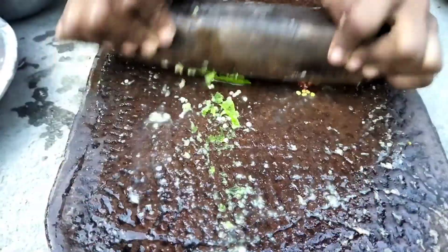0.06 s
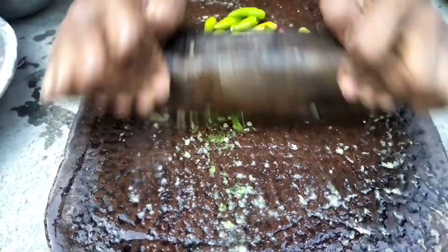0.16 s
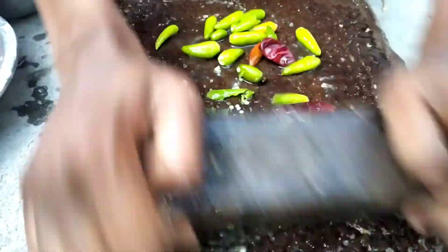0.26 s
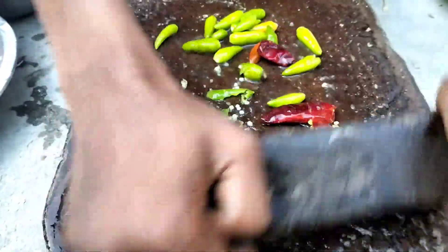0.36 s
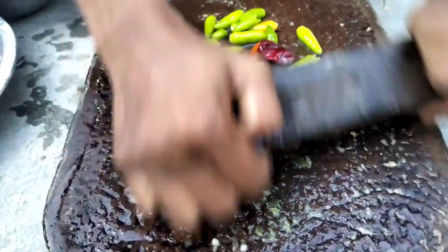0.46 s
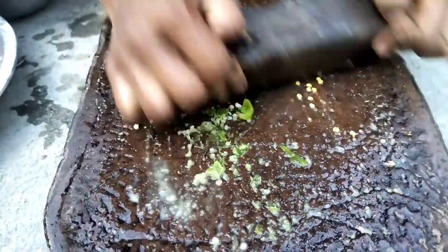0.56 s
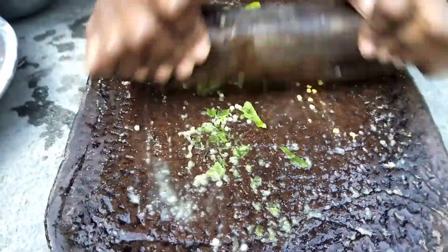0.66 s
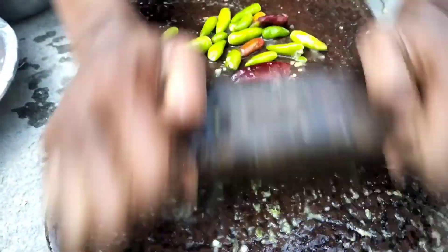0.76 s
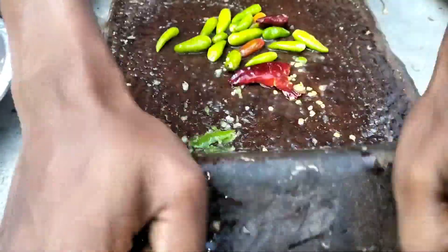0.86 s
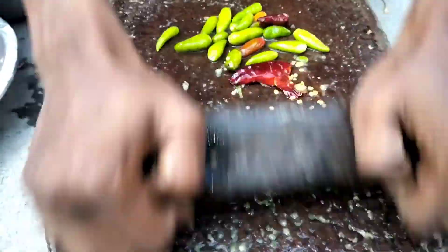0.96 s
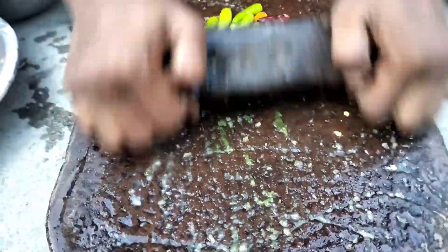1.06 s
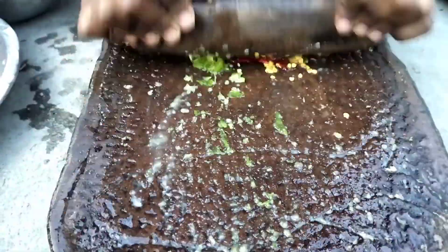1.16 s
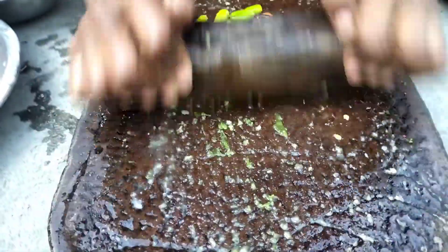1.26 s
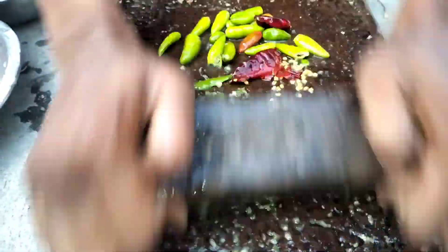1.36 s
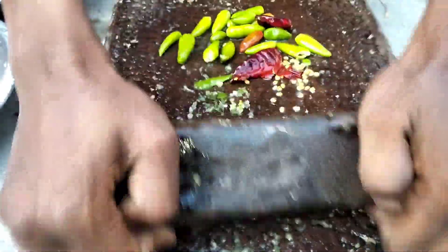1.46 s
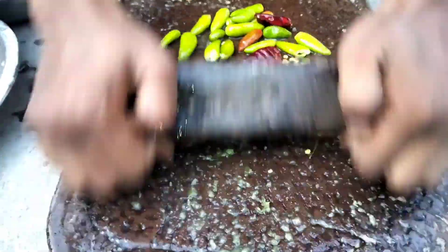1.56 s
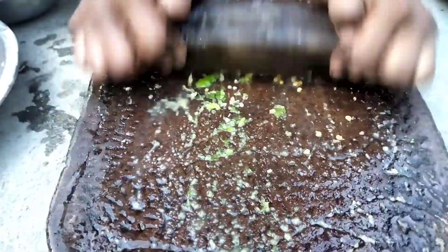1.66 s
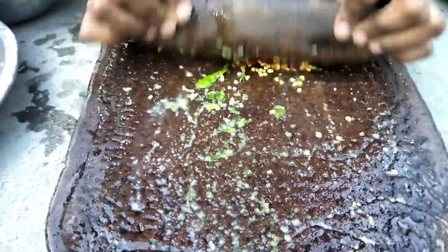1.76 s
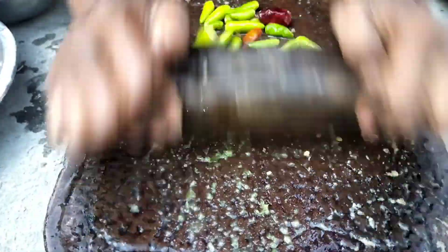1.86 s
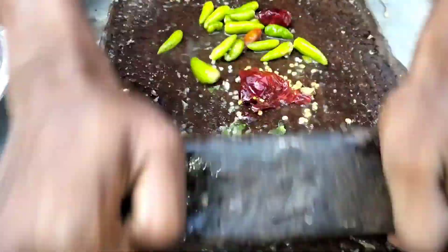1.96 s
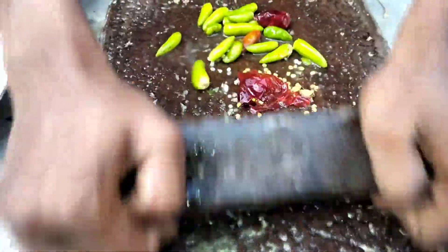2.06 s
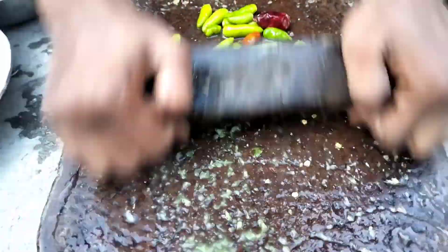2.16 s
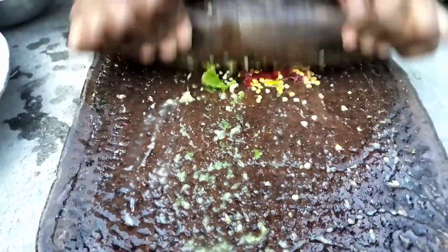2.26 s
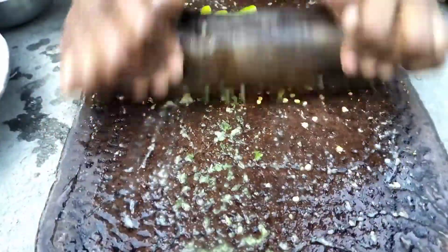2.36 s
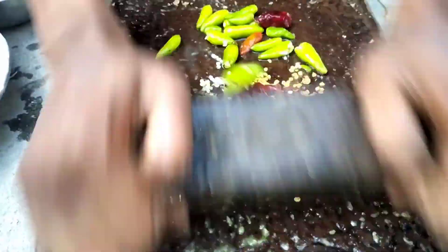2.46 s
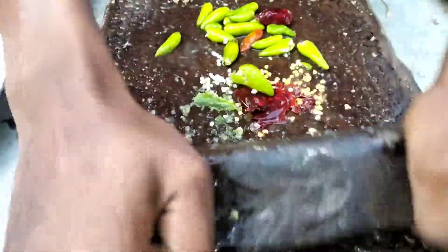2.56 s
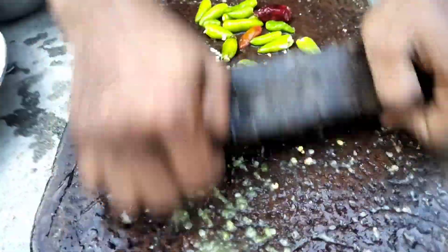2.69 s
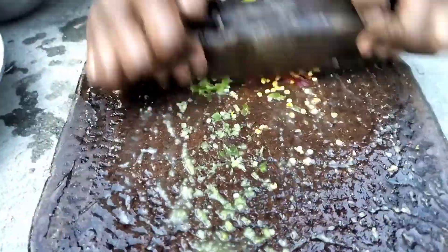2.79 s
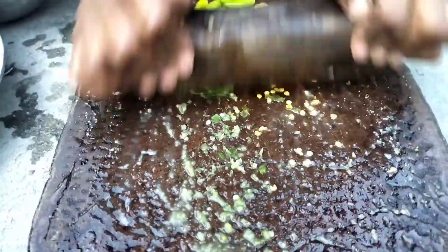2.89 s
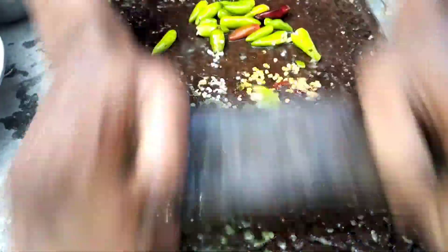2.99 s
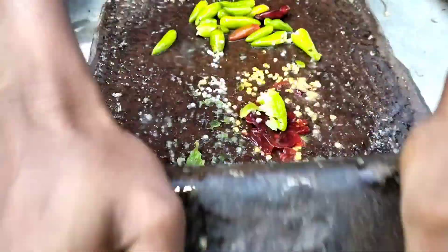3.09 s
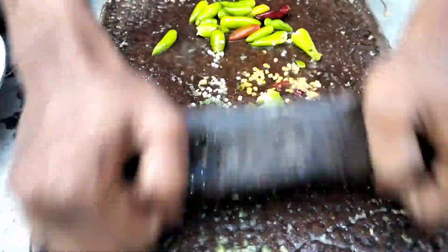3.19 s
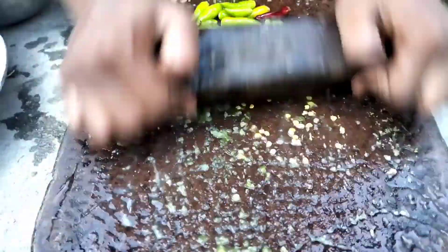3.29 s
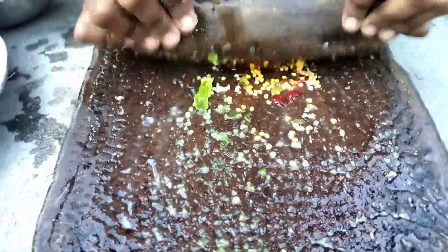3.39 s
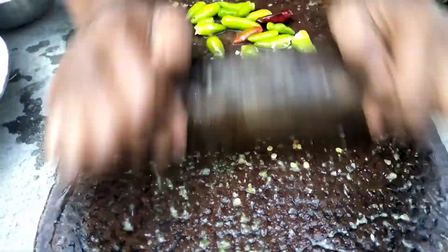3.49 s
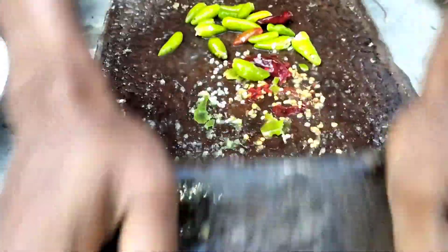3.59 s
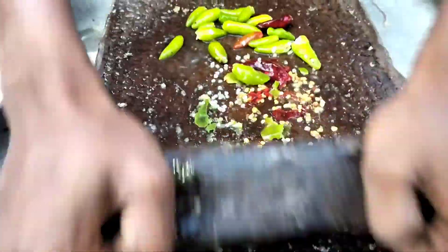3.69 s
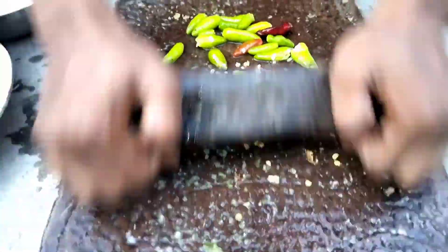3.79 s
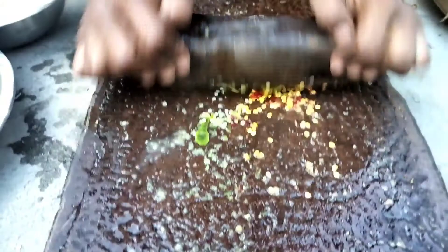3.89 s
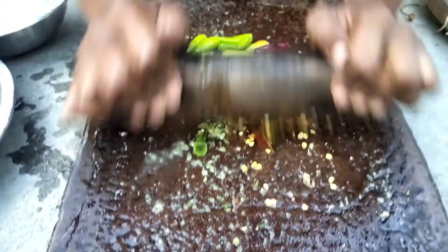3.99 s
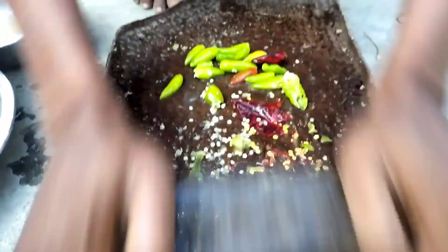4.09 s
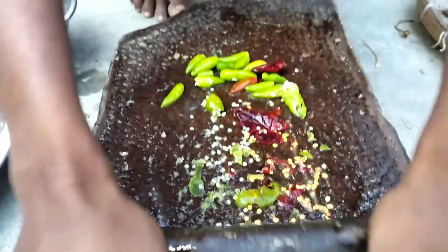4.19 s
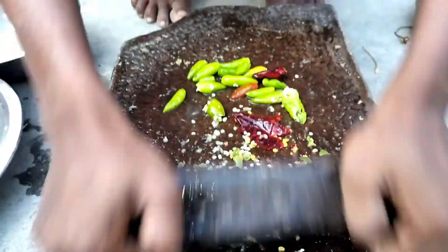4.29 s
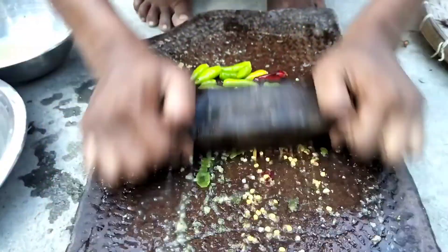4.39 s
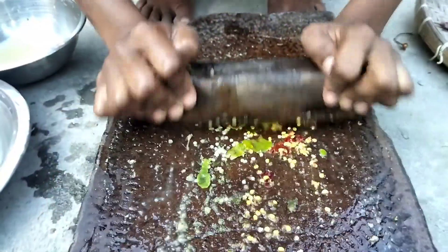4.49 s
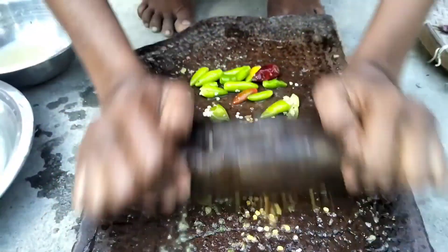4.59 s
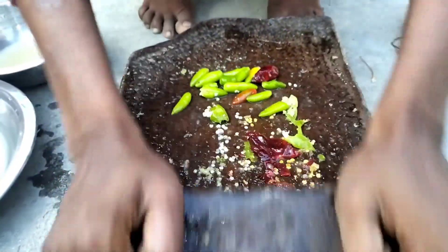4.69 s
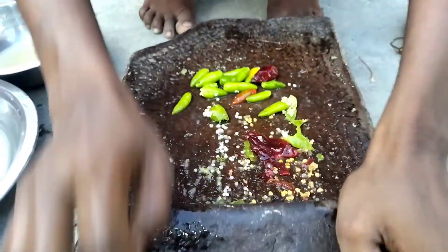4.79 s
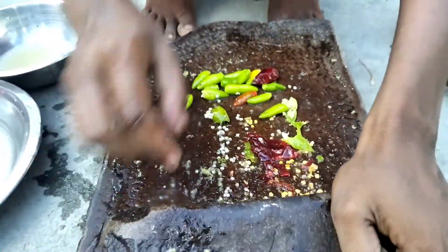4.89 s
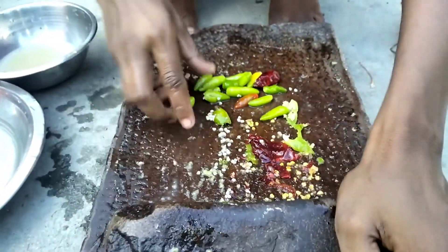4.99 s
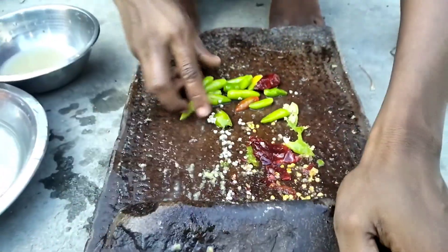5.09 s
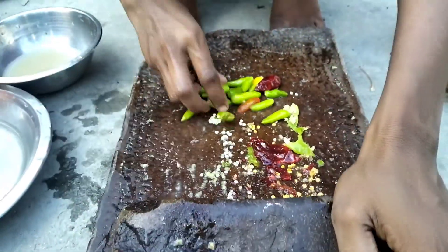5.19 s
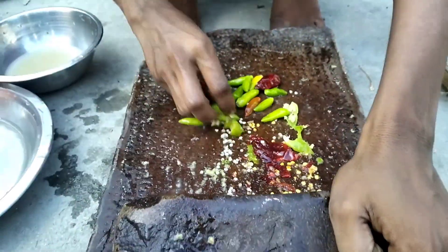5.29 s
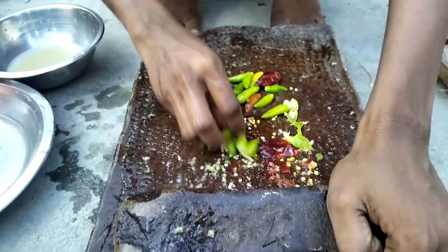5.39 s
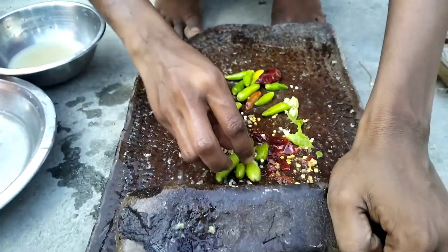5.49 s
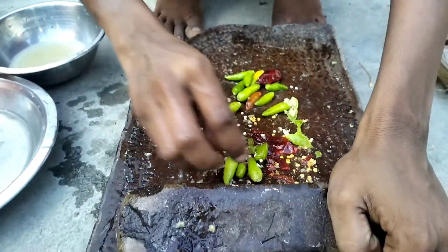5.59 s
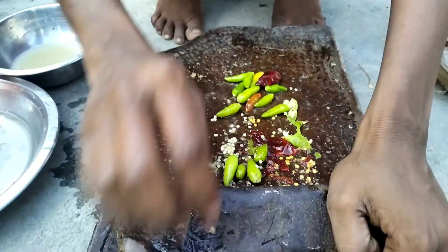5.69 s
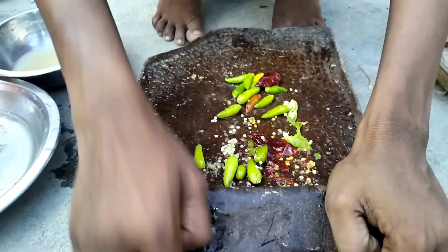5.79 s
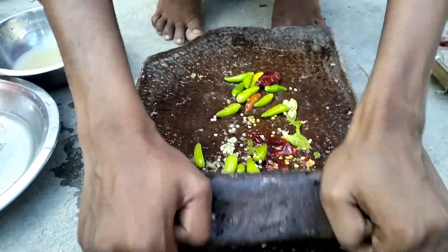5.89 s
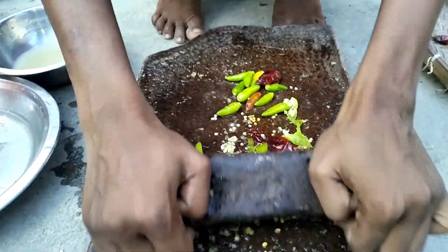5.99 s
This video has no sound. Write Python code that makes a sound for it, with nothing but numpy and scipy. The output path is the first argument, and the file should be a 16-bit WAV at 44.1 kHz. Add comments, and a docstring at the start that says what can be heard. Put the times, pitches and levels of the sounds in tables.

```python
"""A stone roller is rocked over a stone slab close by, crushing chillies: struck modes knock and rumble,
dense cracks crunch through husk resonances, and noise bursts snap skins and seeds.
Low pulses sit under the knocks, and a few dull low bumps come from damped resonators.
Chicks peep nearby as slurred sines and a rooster crows far off as fluttering harmonics,
over a low outdoor rumble and faint air made of filtered noise."""
import sys
import numpy as np
from scipy import signal
from scipy.fft import rfft, irfft
from scipy.io import wavfile
from scipy.ndimage import uniform_filter1d

SR = 44100
rng = np.random.default_rng(int(sys.argv[2]) if len(sys.argv) > 2 else 0)


def log_audio(samples):
    """Write samples as a 16-bit WAV file to the path given in sys.argv[1]."""
    # one column per channel
    frames = np.atleast_2d(samples).T
    # limit to full scale, then quantise
    limited = np.clip(frames, -1, 1)
    pcm = np.round(limited * 32767).astype(np.int16)
    wavfile.write(sys.argv[1], SR, pcm)


N = 266805
TIME = np.arange(N) / SR


def from_db(db):
    """Decibels to gain."""
    return 10 ** (np.asarray(db) / 20)


def rms_one(x):
    """Scale to unit power."""
    return x / np.sqrt(np.mean(x ** 2) + 1e-20)


def add(out, start_s, sound):
    """Mix a sound in at a time."""
    at = max(round(start_s * SR), 0)
    out[at:at + len(sound)] += sound[:max(N - at, 0)]


def above(x, hz):
    """Gentle high-pass."""
    return signal.sosfilt(signal.butter(2, hz, "high", fs=SR, output="sos"), x)


def below(x, hz, order=2):
    """Low-pass."""
    return signal.sosfilt(signal.butter(order, min(hz, .45 * SR), fs=SR, output="sos"), x)


def drift(rate_hz):
    """Slow chance with spread 1: noise through two equal poles, on a grid of every 20th sample."""
    pole = np.exp(-40 * np.pi * rate_hz / SR)
    noise = rng.standard_normal(N // 20 + 2002)
    slow = signal.lfilter([1], [1, -2 * pole, pole * pole], noise)[2000:]  # skip the settling
    return np.interp(np.arange(N) / 20, np.arange(len(slow)), rms_one(slow))


def grains(per_s, spread_db):
    """Random clicks of uneven size and either sign."""
    sizes = from_db(spread_db * np.minimum(rng.exponential(1, N), 4))
    return sizes * rng.choice([-1, 1], N) * (rng.random(N) < per_s / SR)


def ring(clicks, hz, t60_s):
    """Damped resonator: a unit click starts a decaying sine of height 1."""
    radius, angle = from_db(-60 / (t60_s * SR)), 2 * np.pi * hz / SR
    return signal.lfilter([0, np.sin(angle)], [1, -2 * radius * np.cos(angle), radius ** 2], clicks + 1e-18)


def coloured(x, spectrum, size=4096):
    """Causal minimum-phase filter with the given spectrum, by folding its cepstrum."""
    hz, level_db = np.transpose(spectrum)
    grid_hz = np.maximum(np.fft.rfftfreq(size, 1 / SR), 1)
    gain = from_db(np.interp(np.log(grid_hz), np.log(hz), level_db))
    cepstrum = irfft(np.log(gain))
    cepstrum[1:size // 2] *= 2
    cepstrum[size // 2 + 1:] = 0
    impulse = irfft(np.exp(rfft(cepstrum)))
    return signal.fftconvolve(x, impulse)[:len(x)]


def evened(x, size):
    """Hold the power steady over stretches of size samples, keeping the finer grain."""
    return x / np.sqrt(np.abs(uniform_filter1d(x ** 2, size=size)) + 1e-12)


def strokes(rows, attack_s, first_db, last_db, release_s, depth_db=40):
    """Each push of the arms bites quickly, swells to a crest, eases off and lets go; gain over time."""
    gain = np.zeros(N)
    for start_s, swell_s, ease_s, crest_db in rows:
        corners_s = start_s + np.cumsum([-attack_s, attack_s, swell_s, ease_s, release_s])
        corners_db = [-depth_db, first_db, 0, last_db, -depth_db]
        shape_db = np.interp(TIME, corners_s, corners_db, left=-np.inf, right=-np.inf)
        gain += from_db(crest_db + shape_db)
    return gain


# roller and slab modes: (nominal frequency [Hz], relative level [dB], t60 [s])
STONE_MODES = [(637, 1.5, 0.062), (917, -2, 0.047), (997, 0.5, 0.034), (1148.7, 1, 0.039),
               (1440, -9, 0.014), (1718, -6, 0.014), (2318, -4.5, .036), (2710, -27.5, 0.035),
               (4574, -2, .026), (5300, -27, .008), (7150, -6, 0.072), (10600, -13.5, .015)]
# roller knocks on the slab: (time [s], peak before mix [dB],
#   low mode relative to middle modes [dB], upper modes relative to middle modes [dB])
ROLLER_KNOCKS = [(0.118, -9, -9, -17), (0.138, -13, -12.5, -17), (0.166, -3.5, -13, -6),
                 (0.182, -7, -19, 0), (0.208, -1.5, -15, -1.5), (0.395, -3.5, -11.5, -2),
                 (0.482, -8.5, -6, -11), (0.577, -4, -1, -24), (0.592, -8.5, 6, -27),
                 (0.743, -1.5, -13.5, -4.5), (1.027, 3.5, -5, 3), (1.08, -6.5, -6, 1),
                 (1.128, -29.5, -10, -11), (1.319, -18.5, -7, 5.5), (1.347, -15.5, -7, -3.5),
                 (1.552, -4.5, -12, -5), (1.571, -15.5, 2, 0.5), (1.882, -27, -4.5, -7.5),
                 (2.182, 2, -23, 8), (2.243, -6.5, 1, -4), (2.375, -4, -13, -1.5),
                 (2.407, -5.5, -18.5, -4.5), (2.424, -13.5, -19, -12), (2.717, -20.5, -8, -6.5),
                 (2.766, -5.5, 0.5, -2), (2.786, -14, 0.5, -10), (2.909, -6, 4.5, -3), (2.967, 0, -3.5, 12),
                 (3.316, -2, -2, -2.5), (3.452, -9, -14, -5), (3.844, -0.5, -4.5, -2),
                 (4.296, -10.5, -17, -5), (5.983, -18.5, -22, -16), (6.002, -7, -18.5, -17)]


def knocks(grit_s=0.0037, contact_s=0.00027, ping_db=-24.5, ping_spread_db=0.5, cut_hz=470, contact_hz=3100):
    """Grit gives way around each blow; where it lands decides which modes ring, and shifts them a little."""
    out = np.zeros(N)
    t = TIME[:SR // 8] - 1 / 100  # the blow lands 10 ms in
    for time_s, peak_db, low_db, upper_db in ROLLER_KNOCKS:
        blow = 0
        for k, (hz, mode_db, t60_s) in enumerate(STONE_MODES):
            grit_shape = np.exp(-np.maximum(-1.3 * t, t) / grit_s)
            force = .045 * rng.standard_normal(len(t)) * grit_shape
            force[SR // 100] += 1
            mode = ring(force, hz * (1 + .018 * rng.standard_normal()), t60_s)
            # the high pings differ from blow to blow
            high_ping_db = upper_db / 2 + ping_db + ping_spread_db * rng.standard_normal()
            family = np.searchsorted([800, 1500, 3500], hz)  # low, middle, upper, ping
            colour_db = [low_db, 0, upper_db, high_ping_db][family]
            if family < 3:  # the broad contact cannot push the body modes any faster
                mode = below(mode, contact_hz, order=4)
            blow = blow + (-1) ** k * from_db(mode_db + colour_db) * mode / np.abs(mode).max()
        blow = above(blow, cut_hz)
        add(out, time_s + t[0] + contact_s, from_db(peak_db) * blow / np.abs(blow).max())
    return out


def low_thumps(level_db=-52, growth=2.4, push_s=.003):
    """Low pulse under each knock, growing steeply with its level."""
    out = np.zeros(N)
    t = TIME[:SR // 20] / push_s
    pulse = t * (2 - t) * np.exp(1 - t)
    for time_s, peak_db, *_ in ROLLER_KNOCKS:
        add(out, time_s, from_db(level_db + growth * peak_db) * pulse)
    return out


# roller on bare stone: (swell start [s], swell [s], ease [s], crest before mix [dB])
ROLLS = [(0.105, 0.037, .06, -22), (0.232, 0.0078, 0.0059, -23), (0.68, 0.0064, 0.045, -20),
         (1.253, 0.021, 0.012, -21), (1.68, .018, 0.019, -30.5), (1.775, 0.038, 0.0067, -28),
         (2.33, 0.06, 0.062, -19), (2.68, 0.043, 0.013, -26.5), (2.865, 0.062, 0.011, -17.5),
         (3.22, .06, 0.018, -29.5), (3.458, 0.005, 0.024, -12.5), (4.05, 0.059, 0.012, -36),
         (5.26, 0.019, 0.035, -33.5)]


def rolling(dull_db_per_octave=-5.5, corner_hz=1300, cut_hz=520, low_db=2.0, firm_db=-24, brightening=0.49):
    """Pits of the stones bump in clumps; modes take turns, and a firmer push wakes the higher ones."""
    push = strokes(ROLLS, attack_s=0.049, first_db=-10.5, last_db=-10, release_s=0.023)
    pit_bumps = grains(per_s=1100, spread_db=4) * from_db(4 * drift(70))
    firmness = (push / from_db(firm_db) + .05) ** brightening
    body = 0
    for k, (hz, mode_db, t60_s) in enumerate(STONE_MODES):
        dulling_db = dull_db_per_octave * max(np.log2(hz / corner_hz), 0)
        level_db = mode_db + dulling_db + 4 * drift(22)
        drive = firmness if k else from_db(low_db)  # lowest mode ignores firmness
        body = body + (-1) ** k * from_db(level_db) * drive * ring(pit_bumps, hz, t60_s)
    return push * evened(above(body, cut_hz), size=900)


# roller crushing pods, or a hand gathering them: (swell start [s], swell [s], ease [s],
#   dry skin crest before mix [dB], juicy flesh relative to skins [dB])
CRUSHES = [(0.215, 0.13, 0.031, -43, -1), (0.385, 0.013, 0.097, -23.5, -3), (0.77, 0.15, .05, -48, -3),
           (0.965, 0.011, 0.067, -26.5, 3), (1.33, 0.092, .01, -40.5, -8.5),
           (1.425, 0.0085, 0.0058, -35, 10.5), (1.51, 0.057, 0.048, -19, -4.5),
           (1.955, 0.022, .004, -31, -8.5), (2.058, 0.011, 0.0045, -42.5, 12), (2.085, 0.022, .07, -20, -6),
           (2.485, 0.058, 0.014, -33, -8), (2.62, 0.034, 0.06, -17, -10), (2.995, 0.059, 0.058, -38, -7.5),
           (3.172, 0.029, 0.071, -20, -6), (3.52, 0.21, 0.016, -46.5, -5.5), (3.705, .045, 0.085, -20, -4),
           (4.02, 0.15, .025, -35.5, -8.5), (4.256, 0.066, 0.0596, -21.5, -9.5),
           (4.396, 0.016, 0.015, -36, -11), (5.041, 0.023, .006, -39.5, -4.5),
           (5.575, .009, 0.0051, -48.5, 4), (5.695, .06, 0.091, -56.5, 4), (6.0, 0.038, 0.019, -33, -7.5)]
# crunch colour: (frequency [Hz], relative level [dB])
HUSK_COLOUR = [(200, -38.5), (600, -29.5), (950, -20.5), (1450, -23.5), (1900, -24), (2500, -29),
               (3200, -16.5), (3800, -21), (4500, -8), (5500, -6.5), (6600, 4), (7900, -8.5),
               (11000, -11.5), (16000, -20.5)]


def crunch(clump_db=2.5, patchy_db=1.52, fragment_db=0.0, split_hz=4700,
           light_per_s=3000, pressed_per_s=150000, count=20):
    """Harder pressing breaks more cells a second; cracks ring husk bits, each at its own pitch for a while."""
    skin_rows = [row[:4] for row in CRUSHES]
    flesh_rows = [(*timing, db + flesh_db) for *timing, db, flesh_db in CRUSHES]
    skins = strokes(skin_rows, attack_s=0.0099, first_db=-5.5, last_db=-11.5, release_s=0.059)
    flesh = strokes(flesh_rows, attack_s=0.0073, first_db=-6.5, last_db=-14, release_s=.07)

    cracks = grains(light_per_s + pressed_per_s * skins, spread_db=4.0)
    owner = rng.integers(0, count, N)  # which fragment each crack rings
    fragments = 0
    for k, hz in enumerate(np.geomspace(2900, 9000, count)):
        fragments = fragments + from_db(6 * drift(25)) * ring(cracks * (owner == k), hz, t60_s=.014)
    husk = coloured(rms_one(cracks) + from_db(fragment_db) * rms_one(fragments), HUSK_COLOUR)

    def band(side):
        """One side of the split, at steady power."""
        return evened(signal.sosfilt(signal.butter(5, split_hz, side, fs=SR, output="sos"), husk), size=900)

    # skins crackle above the split, flesh squelches below it
    pressed = skins * band("high") + flesh * band("low")
    # seeds and pods lie unevenly under the roller
    return pressed * from_db(clump_db * drift(120) + patchy_db * drift(30))


# skins and seeds snapping: (time [s], peak before mix [dB], pitch [Hz])
SKIN_SNAPS = [(0.3938, -20.5, 7290), (0.4484, -4, 7000), (0.8713, -23.5, 3760), (0.9407, -15.5, 6640),
              (0.9452, -5, 6940), (0.9723, -25, 6640), (1.0042, 1.5, 6850), (1.4309, -6.5, 5004),
              (1.513, -39, 6700), (1.6225, -20, 7350), (1.9686, -12, 7050), (2.071, -9.5, 4940),
              (2.1043, -2.5, 6300), (2.1166, -4, 6530), (2.164, -10, 6860), (2.5343, -10.5, 5940),
              (2.589, -10, 5470), (2.6228, -6, 6200), (2.6544, -33, 6800), (2.709, -11.5, 6600),
              (2.97, -10, 7150), (3.0895, -18, 6260), (3.1478, -16, 7100), (3.1632, -1, 7400),
              (3.1785, 2.5, 7250), (3.648, -29.5, 3480), (3.673, -21, 6750), (3.7014, -26, 5950),
              (3.7546, 2.5, 6040), (4.096, -26, 6400), (4.121, -16.5, 7200), (4.258, -9.5, 6600),
              (5.0504, -31, 4580), (5.6933, -27, 4400), (6.0312, -2, 6340)]


def snaps(burst_s=.0006, splinter=.12, splinter_s=.005, ring_t60_s=0.0035, ring_share=1.0,
          delay_s=0.00023, top_hz=10500):
    """A skin bursts in a short noise pulse, rings briefly at its own pitch and splinters."""
    out = np.zeros(N)
    t = TIME[:SR // 20]
    shape = np.exp(-np.abs(t - delay_s) / burst_s) + splinter * np.exp(-t / splinter_s)
    for time_s, peak_db, hz in SKIN_SNAPS:
        burst = below(coloured(rng.standard_normal(len(t)) * shape, HUSK_COLOUR), top_hz)
        snap = rms_one(burst) + ring_share * rms_one(ring(burst, hz, ring_t60_s))
        add(out, time_s, from_db(peak_db) * snap / np.abs(snap).max())
    return out


# dull low bumps: (time [s], push before resonance and mix [dB])
LOW_BUMPS = [(1.41, -34), (1.428, -22), (1.502, -36), (1.597, -32), (1.717, -39), (1.789, -39)]


def low_bumps(hz=165, t60_s=0.045, deep_hz=98, deep_t60_s=0.16, deep_db=-9):
    """Soft, heavily damped bumps with a deeper tail: two resonators share each push."""
    pushes = np.zeros(N)
    for time_s, push_db in LOW_BUMPS:
        add(pushes, time_s, from_db([push_db]))
    soft = ring(pushes, hz, t60_s) + from_db(deep_db) * ring(pushes, deep_hz, deep_t60_s)
    return above(above(soft, 70), 70)


# chick peeps: (end [s], length [s], crest before flutter and mix [dB], closing slur [s])
CHICK_PEEPS = [(0.737, 0.09, -46, .10), (1.95, .12, -52, 0.067), (2.297, 0.052, -50, 0.086),
               (3.63, 0.11, -45.5, 0.072), (3.973, 0.092, -60, 0.15), (4.084, 0.09, -33, 0.07),
               (4.572, .20, -33.5, 0.066), (4.871, .17, -59, .10), (5.162, 0.2, -26.5, 0.05),
               (5.617, 0.19, -50.5, 0.068), (5.686, 0.15, -39.5, 0.07), (5.753, .075, -35.5, 0.043)]


def chicks(top_hz=4860, knee_hz=4280, end_hz=2176, arch_s=0.048, whistle_db=-12, last_db=-14,
           swell_s=0.029, fade_s=.045, second_ratio=.82, second_db=-17):
    """A rough whistle near the top arches to the knee, then slurs down; the syrinx's other side is faint below."""
    out = np.zeros(N)
    wobble, flutter_db = 1 + .015 * drift(150), 4 * drift(70)
    for end_s, length_s, crest_db, slur_s in CHICK_PEEPS:
        span = (TIME > end_s - length_s) & (TIME < end_s)
        t = TIME[span] - end_s  # counts up to 0
        arch_hz = (top_hz - knee_hz) * (1 - np.exp(np.minimum(t + slur_s, 0) / arch_s))
        hz = np.interp(t, [-slur_s, 0], [knee_hz, end_hz]) + arch_hz
        phase = 2 * np.pi * np.cumsum(hz * wobble[span]) / SR
        voice = np.sin(phase) + from_db(second_db) * np.sin(second_ratio * phase)
        level_db = crest_db + np.interp(t, [-fade_s - swell_s, -fade_s, 0], [whistle_db, 0, last_db])
        gain = np.sqrt(2) * from_db(level_db + flutter_db[span])
        out[span] += gain * signal.windows.tukey(len(t), .15) * voice
    return out


# far rooster: (time [s], pitch [Hz], level before mix [dB])
CROW_PATH = [(0.15, 480, -61), (0.25, 498, -51), (0.36, 486, -52), (0.43, 466, -46), (0.54, 465, -52.5),
             (0.66, 459, -68), (0.86, 494, -53), (1.10, 491, -51.5), (1.22, 465, -71)]
# crow partials: (multiple of pitch, relative level [dB])
CROW_PARTIALS = [(2, -22), (3, -16.5), (4, 6.5), (7, -16), (8, -20.5)]


def rooster():
    """One long, hoarse crow: harmonics of a wavering pitch that flutter on their way through the air."""
    time_s, pitch_hz, level_db = np.transpose(CROW_PATH)
    hz = np.interp(TIME, time_s, pitch_hz) * (1 + .02 * drift(120))
    phase = 2 * np.pi * np.cumsum(hz) / SR
    voice = sum(from_db(partial_db) * np.sin(round(k) * phase) for k, partial_db in CROW_PARTIALS)
    gain = from_db(np.interp(TIME, time_s, level_db, left=-np.inf, right=-np.inf))
    return gain * rms_one(voice * from_db(4 * drift(30)))


# distant rumble: (time [s], level [dB])
RUMBLE_LEVEL = [(0, -56), (0.7, -45.5), (2.0, -51.5), (3.1, -49), (4.2, -50), (4.65, -55.5), (5.3, -52.5),
                (6.05, -50)]
# rumble colour: (frequency [Hz], relative level [dB])
RUMBLE_COLOUR = [(25, -40.5), (55, -24.5), (90, -15.5), (125, 2), (160, 6.5), (210, -2), (300, -13),
                 (500, -21), (900, -36)]
# faint air colour: (frequency [Hz], relative level [dB])
AIR_COLOUR = [(200, -32), (620, 4), (1000, -7.5), (1700, -11.5), (3000, -7.5), (4600, -9.5), (6800, -5.5),
              (8200, -23), (12000, -24.5), (16000, -44)]


def outdoors(air_db=-61.0):
    """Low distant rumble of varying level and steady faint air, both coloured noise."""
    rumble_gain = from_db(np.interp(TIME, *np.transpose(RUMBLE_LEVEL)))
    rumble = rumble_gain * rms_one(coloured(rng.standard_normal(N), RUMBLE_COLOUR))
    air = from_db(air_db) * rms_one(coloured(rng.standard_normal(N), AIR_COLOUR))
    return rumble + air


def echoes(x, t60_s, delay_s):
    """Diffuse reflections: a decaying noise tail of unit power."""
    t = TIME[:SR // 2]
    tail = rng.standard_normal(len(t)) * from_db(-60 * t / t60_s) * (t > delay_s)
    return signal.fftconvolve(x, tail / np.sqrt(np.sum(tail ** 2)))[:N]


def scene():
    """The stones are close and nearly dry; the birds carry more of the yard."""
    stones = from_db(-4.0) * knocks() + from_db(-6.0) * rolling()
    pods = from_db(-2.5) * crunch() + from_db(-4.0) * snaps()
    birds = from_db(-1.0) * chicks() + from_db(2) * rooster()
    yard = from_db(-20) * echoes(stones, t60_s=0.096, delay_s=0.0088)
    yard += from_db(-18.5) * echoes(pods, t60_s=.13, delay_s=0.0067)
    yard += from_db(-5) * echoes(birds, t60_s=0.12, delay_s=0.004)
    lows = low_thumps() + from_db(5.0) * low_bumps()
    return (stones + pods + lows + birds + yard + outdoors())[None]


def record(dry, cutoff_hz=15700):
    """The highest peaks are rounded and the top is cut."""
    rounded = dry / (1 + dry ** 6) ** (1 / 6)
    return signal.sosfilt(signal.ellip(10, .2, 80, cutoff_hz, fs=SR, output="sos"), rounded)


dry = scene()
out = record(dry)
log_audio(out)
```